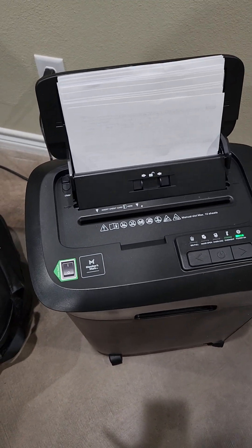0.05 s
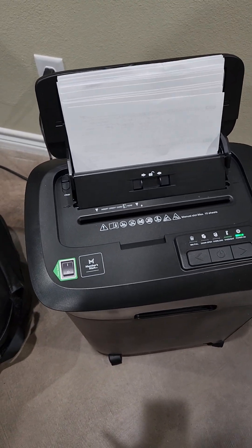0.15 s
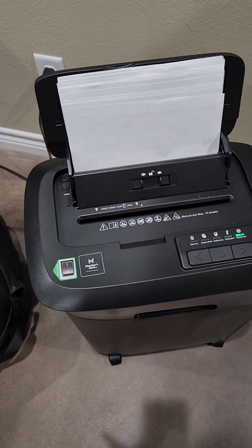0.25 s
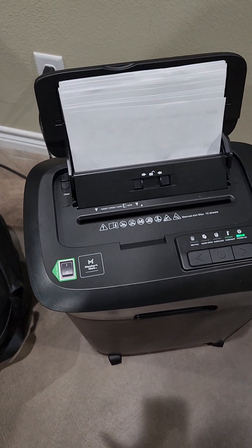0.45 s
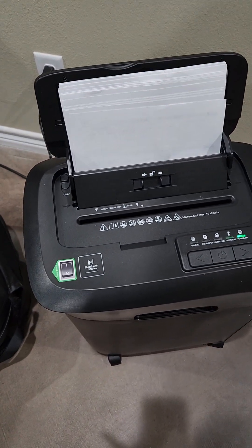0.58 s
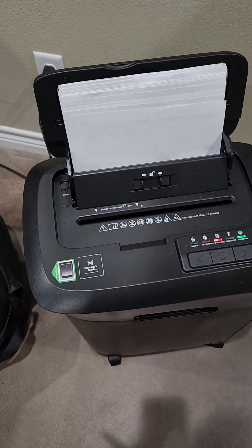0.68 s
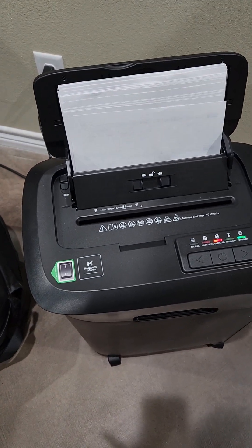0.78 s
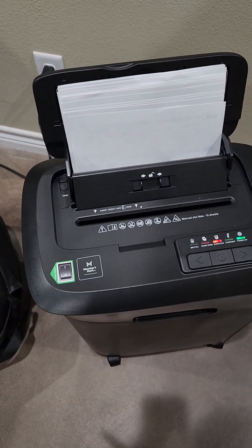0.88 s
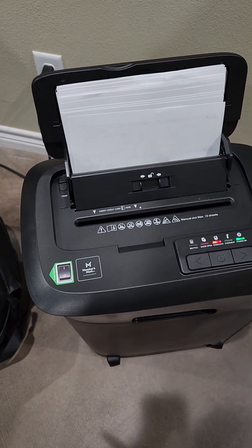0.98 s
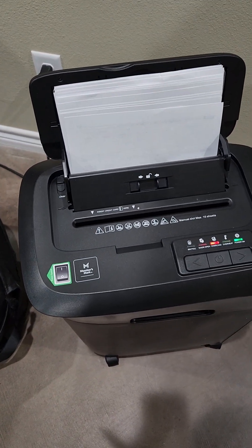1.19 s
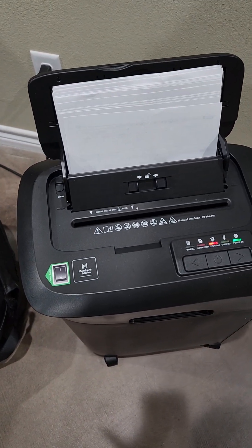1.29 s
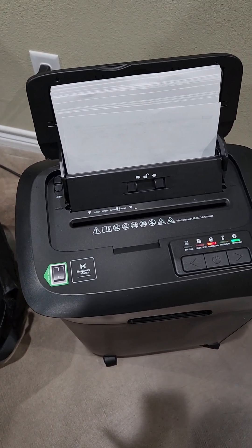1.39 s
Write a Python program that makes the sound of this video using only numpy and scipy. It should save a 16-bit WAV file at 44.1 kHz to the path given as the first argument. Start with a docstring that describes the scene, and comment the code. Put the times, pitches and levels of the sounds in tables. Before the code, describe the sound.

A paper shredder's motor runs for half a second, gears rattling, then stops with a clack.

```python
"""A paper shredder runs for half a second in a quiet carpeted room.
Room noise and a faint fan tone lie underneath from the start. At 0.2 s the gears begin to rattle, the
motor hums, the bin rumbles and a switch ticks; the gears knock as they take up slack and whine up to
speed. They knock again as they slow, and a panel sings briefly. At 0.66 s a latch clacks and rings
the housing, and the drive winds down, the bin's rumble dying last."""
import sys
import numpy as np
from scipy import signal
from scipy.fft import rfft, irfft
from scipy.io import wavfile

SR = 44100
rng = np.random.default_rng(int(sys.argv[2]) if len(sys.argv) > 2 else 0)


def transcribe(u):
    """Save the signal u as a 16-bit wav file named by the first command-line argument.

    u: samples, shape (n,) or (channels, n), limited to [-1, 1]; the rate is SR.
    q: integer samples, one column per channel.
    """
    v = np.clip(np.atleast_2d(u).T, -1, 1)
    q = np.round(v * 32767).astype(np.int16)
    wavfile.write(sys.argv[1], SR, q)


N = 63945
T = np.arange(N) / SR
HUM_HZ = 120  # twice the mains rate

# stereo image of the machine: f/Hz, left-right likeness, left over right/dB
MACHINE_IMAGE = [(98, 1, 1.5), (259, 0.98, 2.5), (500, 0.8, -1.5), (900, 0.53, 1), (1800, 0.49, 2.5),
                 (2860, .25, 2.5), (3570, 0.36, 6), (4950, 0.27, 6), (7800, 0.076, 10.5), (11850, .05, 10)]
# colour of a hard plastic contact: f/Hz, level/dB
TICK_COLOUR = [(300, -0.5), (1200, 11), (2000, 6), (3000, -1.5), (5000, -2), (8200, -3), (9500, -20),
               (12000, -6.5), (16000, -22)]


def from_db(db):
    """Decibels to gain."""
    return 10 ** (np.asarray(db) / 20)


def unit_power(x):
    """Scale to an RMS of one."""
    return x / np.sqrt(np.mean(x ** 2) + 1e-20)


def envelopes(rows):
    """One gain curve per level column of (t/s, level/dB, ...), silent outside the rows."""
    times, *columns = np.transpose(rows)
    return [from_db(np.interp(T, times, db, left=-140, right=-140)) for db in columns]


def per_bin(rows, column=1):
    """A table column spread over the FFT bins on a log frequency scale."""
    rows = np.array(rows)
    hz = np.arange(N // 2 + 1) * SR / N
    return np.interp(np.log(hz + 1), np.log(rows[:, 0]), rows[:, column])


def pan(db):
    """Left and right gains for a level difference."""
    return from_db(np.array([[.5], [-.5]]) * db)


def drift(rate_hz):
    """Random wander of spread 1, mostly slower than rate_hz."""
    hz = np.arange(N // 2 + 1) * SR / N
    return unit_power(irfft(rfft(rng.standard_normal(N)) / (1 + (hz / rate_hz) ** 2), N))


def noise(colour, image):
    """Stereo noise of a given colour, width and balance."""
    mid, side = rfft(rng.standard_normal((2, N)))
    alike = np.clip(per_bin(image), -1, 1)
    pair = np.sqrt(1 + alike) * mid + np.sqrt(1 - alike) * side * [[1], [-1]]
    return unit_power(irfft(pair * from_db(per_bin(colour)) * pan(per_bin(image, column=2)), N))


def diffuse(colour):
    """Coloured noise, unrelated in the two ears."""
    return irfft(rfft(rng.standard_normal((2, N))) * from_db(per_bin(colour)), N)


def tone(phase, pan_db=0, lead=0):
    """A stereo sine, of unit power when centred; the left ear leads by lead radians."""
    return np.sqrt(2) * pan(pan_db) * np.array([np.sin(phase + lead), np.sin(phase)])


def phase_of(hz):
    """Running phase of a pitch curve."""
    return 2 * np.pi * np.cumsum(hz) / SR


def burst(start, decay_s):
    """Instant attack, exponential decay."""
    return (T >= start) * np.exp(-np.abs(T - start) / decay_s)


def struck(modes, strikes):
    """Modes (f/Hz, level/dB, t60/s) set ringing by strikes (t/s, level/dB)."""
    blows = np.zeros(N)
    for start, db in strikes:
        blows[int(start * SR)] += from_db(db)
    ring = sum(from_db(db - 60 * T / t60) * np.sin(2 * np.pi * hz * T) * (-1) ** k
               for k, (hz, db, t60) in enumerate(modes))
    return signal.fftconvolve(blows, ring)[:N]


def lag_right(x):
    """The right ear hears the machine a little later."""
    # phase between the ears: f/Hz, left lead/rad
    lead = [(250, 0), (500, .5), (900, 2.06), (1800, 2), (2800, 4.5), (3600, 4), (5000, 5), (7500, 11)]
    return irfft(rfft(x) * np.exp(1j * per_bin(lead) * [[0], [-1]]), N)


def to_ears(x):
    """Place a point on the machine: later and duller on the right."""
    return lag_right(irfft(rfft(x) * pan(per_bin(MACHINE_IMAGE, column=2)), N))


def reverb(x, t60_s=0.49, predelay_s=.003):
    """Diffuse room reflections that die away."""
    # colour of the tail: f/Hz, level/dB
    colour = [(100, 7.5), (450, 2.5), (1000, 3.5), (2000, -1), (4000, -3.5), (8000, -2.5), (10000, -2.5),
              (15000, -9)]
    tail = diffuse(colour) * burst(predelay_s, t60_s / np.log(1000))
    return signal.fftconvolve(x, unit_power(tail) / np.sqrt(N), axes=1)[:, :N]


def room_tone(floor_db=-54.5, waver_db=2.3):
    """A bed of low room noise and the wavering tones of a far fan."""
    # fan tones: f/Hz, level/dB, left over right/dB, left lead/rad
    fan_tones = [(591, -67, -0.5, -0.3), (634.4, -57, 2.2, 0.5), (893, -70, 0.5, 0.25), (1265, -65, 3, -2),
                 (1536, -66.5, 1.5, 4)]
    # colour of the room noise: f/Hz, level/dB
    floor_colour = [(20, -26), (35, -7), (52, 0.5), (75, -5.5), (120, -11), (160, -13.5), (260, -17.5),
                    (350, -12), (450, -17.5), (750, -13.5), (1100, -17), (1400, -24.5), (2300, -26.5),
                    (3200, -28), (3900, -37), (6300, -39), (7200, -46), (8300, -42), (9200, -77),
                    (16000, -55)]
    # its stereo image: f/Hz, left-right likeness, left over right/dB
    floor_image = [(60.3, 0.95, .5), (250, 0.94, 3), (710, 0.17, 3), (2020, 0.076, -4.5),
                   (3000, 0.063, 2.5), (5000, .05, 11), (8000, .05, 13.5)]
    fan = sum(from_db(db + waver_db * drift(22))
              * tone(2 * np.pi * hz * T + .4 * drift(1.9), side, lead)
              for hz, db, side, lead in fan_tones)
    return fan + from_db(floor_db) * noise(floor_colour, floor_image)


def gear_rattle(tooth_hz, grains_per_s=300, grain_s=0.0024, grain_share=0.33, tooth_depth=0.15):
    """Meshing teeth and loose small contacts: a dull churn, and a hiss roughened by both."""
    # rattle envelopes: t/s, body level/dB, treble level/dB
    rattle_levels = [(.208, -75, -66), (.217, -45, -43), (.235, -32, -42), (.27, -38, -43),
                     (.31, -44.5, -42), (.43, -38, -43.5), (.5, -39.5, -39.5), (.56, -43, -42.5),
                     (.64, -38.5, -45.5), (.68, -41, -37), (.74, -39, -45), (.785, -31.5, -40),
                     (.82, -43, -51), (.87, -48.5, -67), (.95, -62.5, -97)]
    # colour of the churning body: f/Hz, level/dB
    body_colour = [(40, -39), (90, -1), (140, 10.5), (180, 6.5), (290, 1.5), (350, 0.5), (420, -0.5),
                   (600, -1.5), (900, -1.5), (1300, -8), (1800, -51)]
    # colour of the treble hiss: f/Hz, level/dB
    treble_colour = [(900, 0.5), (1500, 2.5), (2300, 3), (3000, -4), (3700, 0), (4400, -8), (6500, -11),
                     (7900, -7), (9200, -29), (10500, -23.5), (12000, -19), (15800, -21.5)]
    body, treble = envelopes(rattle_levels)
    hits = rng.random(N) < grains_per_s / SR
    strength_db = np.minimum(5 * rng.exponential(1, N), 9)
    contacts = hits * from_db(strength_db)
    grains = unit_power(signal.lfilter([1], [1, -np.exp(-1 / (grain_s * SR))], contacts + 1e-18))
    meshing = 1 + tooth_depth * np.sin(phase_of(tooth_hz))
    grit = unit_power(np.sqrt(1 - grain_share + grain_share * grains ** 2) * meshing)
    churn = body * noise(body_colour, MACHINE_IMAGE)
    hiss = treble * grit * noise(treble_colour, MACHINE_IMAGE)
    return lag_right(churn + hiss)


def motor_hum(waver_db=2.34):
    """Magnetic hum at twice the mains rate, each partial wavering on its own."""
    # hum envelope: t/s, level/dB
    hum_level = [(.21, -59), (.225, -40.5), (.25, -30), (.285, -29.5), (.32, -36.5), (.36, -32), (.42, -42),
                 (.54, -38.5), (.62, -38), (.66, -35), (.69, -35), (.745, -34), (.79, -45), (.86, -43),
                 (.93, -66)]
    # hum partials: harmonic number, level/dB
    partials = [(1, -1), (2, -17), (3, -27)]
    hum = sum(from_db(db + waver_db * drift(40))
              * tone(k * 2 * np.pi * HUM_HZ * T + 0.18 * drift(27), pan_db=1.55)
              for k, db in partials)
    return envelopes(hum_level)[0] * hum


def bin_rumble(pitch_hz=71.8, wander_hz=6.63, waver_db=1):
    """The bin rumbles under the motor: one deep tone, unsteady in pitch and level."""
    # rumble envelope: t/s, level/dB
    rumble_level = [(.21, -72), (.25, -43), (.32, -55), (.36, -38.5), (.42, -37.5), (.47, -28), (.51, -46),
                    (.62, -42.5), (.72, -48), (.8, -46), (.86, -55), (.91, -46), (.95, -57.5), (1, -46),
                    (1.04, -46.5), (1.08, -64)]
    waver = from_db(waver_db * drift(19))
    rumble = tone(phase_of(pitch_hz + wander_hz * drift(25)), pan_db=1)
    return envelopes(rumble_level)[0] * waver * rumble


def ticks(decay_s=0.0025, reverb_db=-4.5):
    """Switch and gears give short plastic ticks that carry into the room."""
    # tick cues: t/s, level/dB, left over right/dB
    cues = [(0.216, -33, 6), (0.2488, -17, 3), (0.2525, -28, 8.5), (0.3395, -33, 2), (.394, -34, 11),
            (0.4654, -22, 3), (0.5174, -21, 1.5), (0.5709, -30.5, 7), (.609, -29.5, 7), (0.745, -32, 8),
            (0.7891, -32, 1)]
    bursts = sum(from_db(db) * pan(side) * burst(start, decay_s) for start, db, side in cues)
    direct = unit_power(diffuse(TICK_COLOUR)) * bursts / 2
    return direct + from_db(reverb_db) * reverb(direct)


def gear_whine(tooth_hz, throb_depth=0.21, waver_db=2.1):
    """Three harmonics of the tooth rate, throbbing with the motor's torque."""
    # envelopes of the gear tones: t/s, low level/dB, middle level/dB, high level/dB
    whine_levels = [(.22, -75, -69, -82), (.285, -60, -46, -54), (.315, -41.5, -37, -60),
                    (.345, -36.5, -42, -42), (.41, -39, -34, -45), (.45, -38.5, -33, -43),
                    (.48, -56, -35, -52.5), (.52, -52, -48.5, -50), (.6, -52, -49, -70),
                    (.66, -72, -49, -85), (0.849, -80, -68, -92)]
    # gear tones: multiple of the tooth rate, left over right/dB, left lead/rad
    partials = [(2, -2, 1.82), (3, 4.5, 1.12), (6, 4.5, 2.08)]
    throb = 1 + throb_depth * np.sin(2 * np.pi * HUM_HZ * T)
    whine = sum(level * from_db(waver_db * drift(18)) * tone(k * phase_of(tooth_hz), side, lead)
                for level, (k, side, lead) in zip(envelopes(whine_levels), partials))
    return throb * whine


def gear_knocks():
    """The gears take up their slack and knock on the hollow gearbox."""
    # knock cues: t/s, level/dB
    cues = [(.2495, 5), (0.5159, -2.5)]
    # gearbox modes: f/Hz, level/dB, t60/s
    gearbox = [(600, -43, .07), (1050, -33, .06), (1140, -31, .06), (1330, -32, .06), (1730, -36, .06),
               (1900, -42, .05), (2400, -41, .04)]
    return to_ears(struck(gearbox, cues))


def singing_panel(pitch_hz=1208):
    """A panel sings briefly on one note as the gears slow."""
    # panel envelope: t/s, level/dB
    panel_level = [(.54, -58), (.555, -43), (.575, -28.5), (.6, -40.5), (.64, -40.5), (.7, -73)]
    note = tone(2 * np.pi * pitch_hz * T + 0.49 * drift(25.4), pan_db=3, lead=-2.1)
    return envelopes(panel_level)[0] * note


def latch(crack_decay_s=0.0011, reverb_db=-7.5):
    """The latch lands and bounces: a quick run of contacts cracks and rings the housing."""
    # latch contacts: t/s, level/dB
    contacts = [(.6571, -5.5), (.6577, -4), (.6585, -3.5), (.6593, 1.5), (.66, -11.5), (.6675, -27)]
    # housing modes: f/Hz, level/dB, t60/s
    housing = [(422, -29, 0.077), (504, -28.5, 0.059), (599, -25, 0.052), (880, -25, 0.036),
               (1140, -32, 0.019), (1465, -32.5, 0.033), (1904, -18.5, 0.013), (2093, -15.5, 0.029),
               (2902, -19, 0.011), (3558, -20.5, 0.012), (4200, -24, .01), (4750, -23.5, 0.0077),
               (7700, -33.5, 0.005), (12000, -49.5, 0.0028), (14200, -37, 0.00355)]
    bursts = sum(from_db(db - 18.5) * burst(start, crack_decay_s) for start, db in contacts)
    crack = noise(TICK_COLOUR, MACHINE_IMAGE) * bursts / 2
    direct = to_ears(struck(housing, contacts)) + crack
    return direct + from_db(reverb_db) * reverb(direct)


def scene(speed_jitter=0.001):
    """The shredder over the room tone; one speed curve drives both whine and rattle."""
    # the gears spin up, hold and run down: t/s, tooth rate/Hz
    speed = [(.21, 201), (.26, 321.2), (.3, 386), (.345, 397), (.41, 397), (.47, 395.4), (.52, 380.6),
             (.58, 357.5), (.64, 323), (.9, 151.4)]
    tooth_hz = np.interp(T, *np.transpose(speed)) * (1 + speed_jitter * drift(27))
    drive = motor_hum() + bin_rumble() + gear_whine(tooth_hz) + singing_panel() + gear_rattle(tooth_hz)
    return drive + ticks() + gear_knocks() + latch() + room_tone()


def record(dry, low_cut_hz=38, high_cut_hz=16000):
    """The microphone loses the deepest bass; the top is cut steeply."""
    low_cut = signal.butter(2, low_cut_hz, "high", fs=SR, output="sos")
    high_cut = signal.ellip(10, .2, 70, high_cut_hz, fs=SR, output="sos")
    return signal.sosfilt(high_cut, signal.sosfilt(low_cut, dry))


dry = scene()
out = record(dry)
transcribe(out)
```